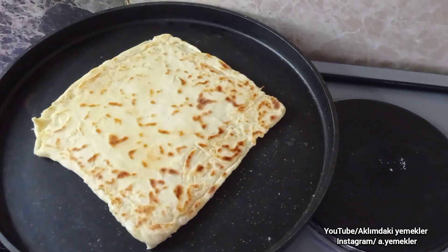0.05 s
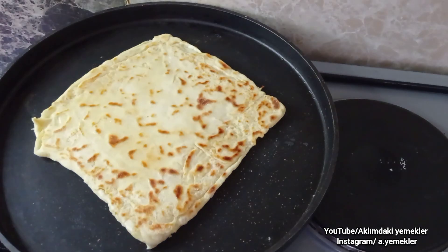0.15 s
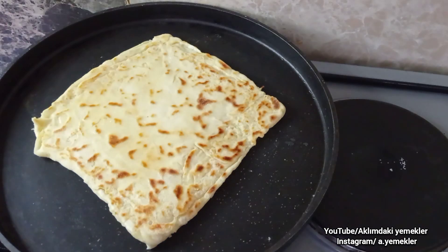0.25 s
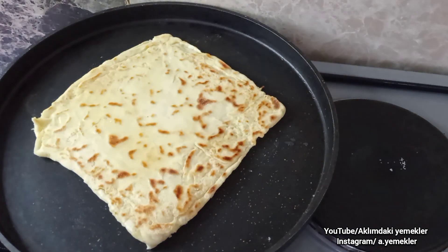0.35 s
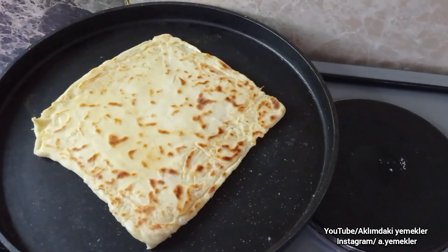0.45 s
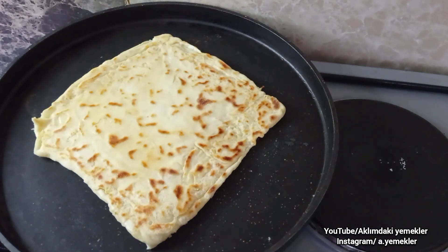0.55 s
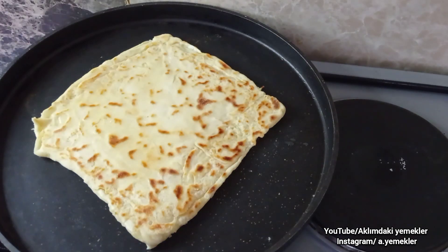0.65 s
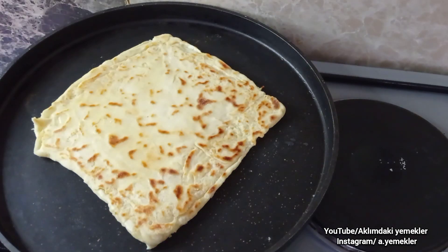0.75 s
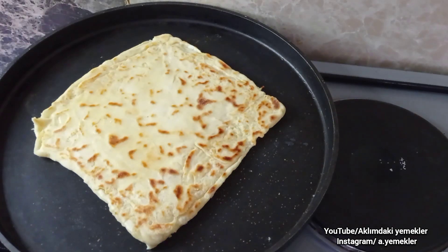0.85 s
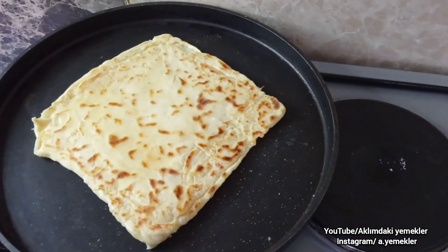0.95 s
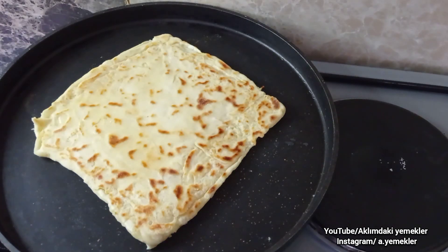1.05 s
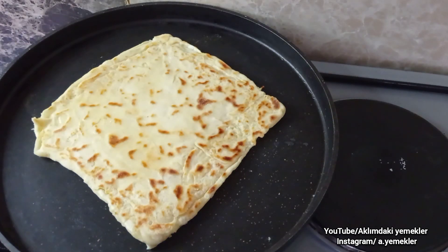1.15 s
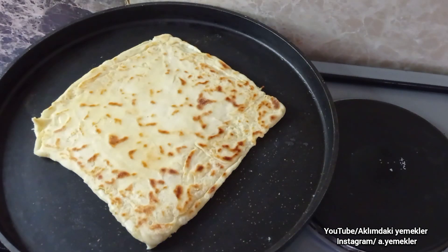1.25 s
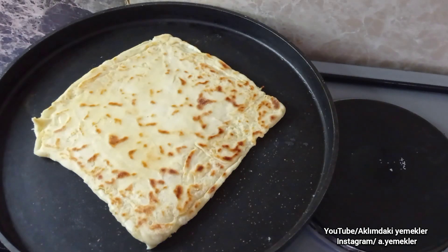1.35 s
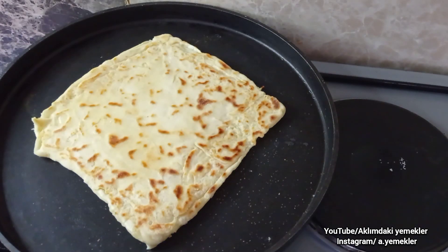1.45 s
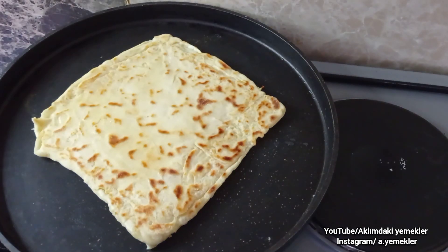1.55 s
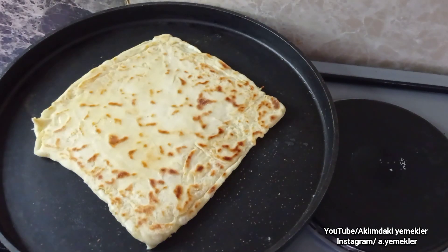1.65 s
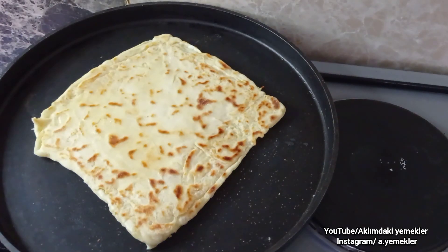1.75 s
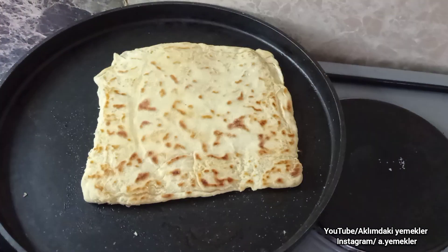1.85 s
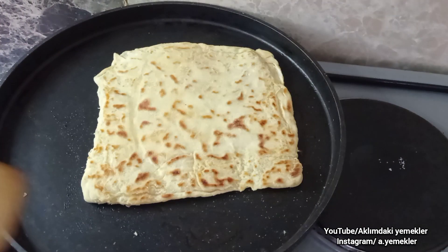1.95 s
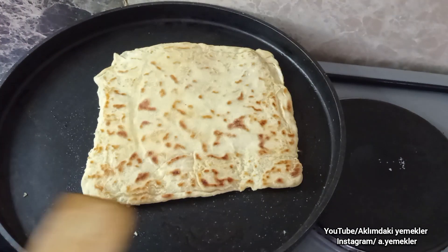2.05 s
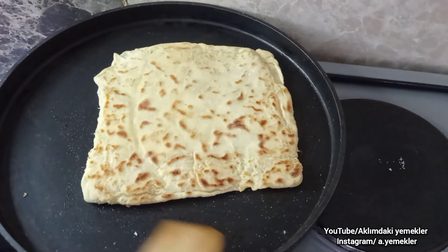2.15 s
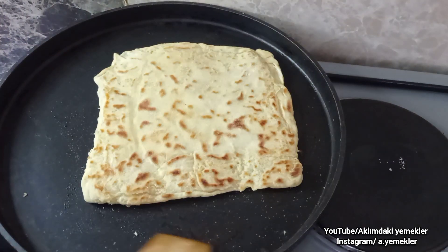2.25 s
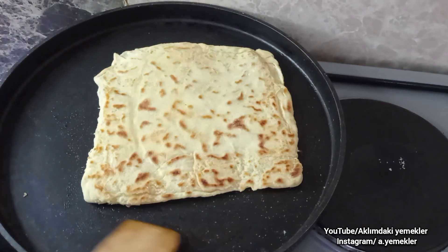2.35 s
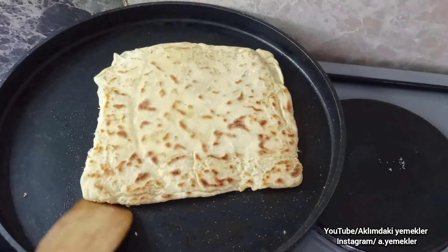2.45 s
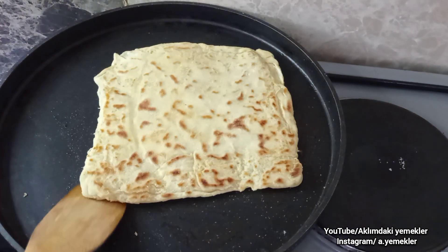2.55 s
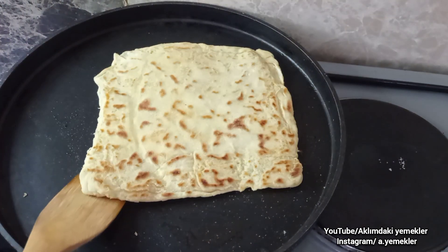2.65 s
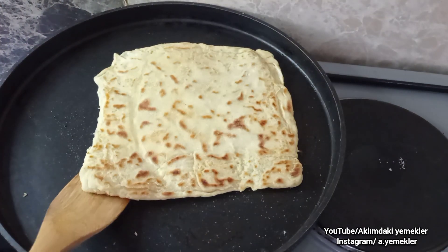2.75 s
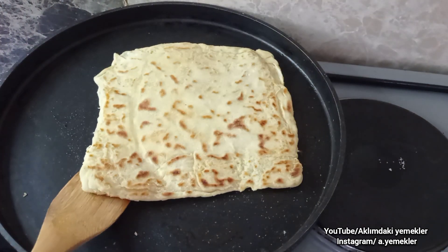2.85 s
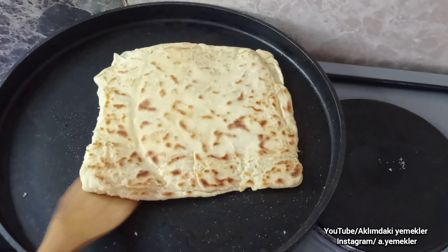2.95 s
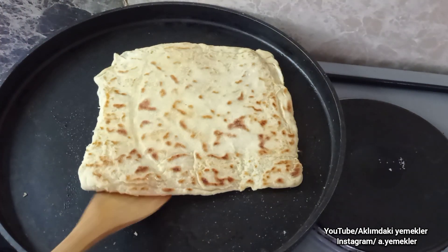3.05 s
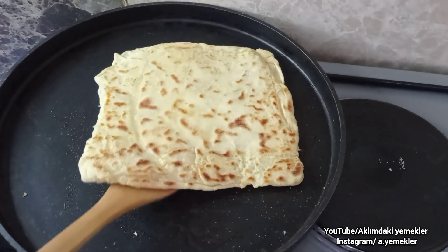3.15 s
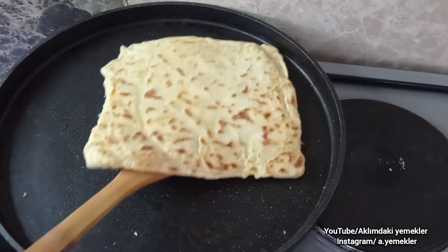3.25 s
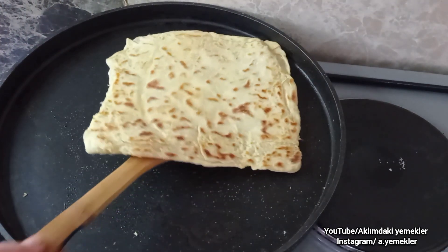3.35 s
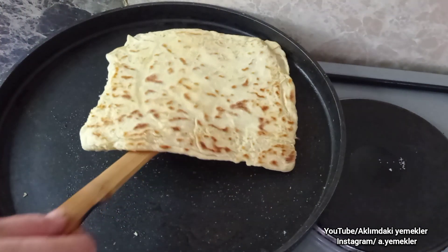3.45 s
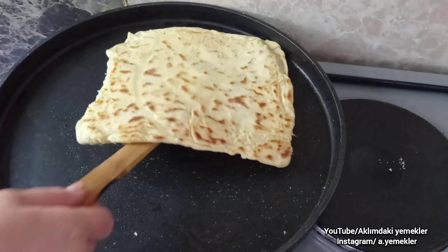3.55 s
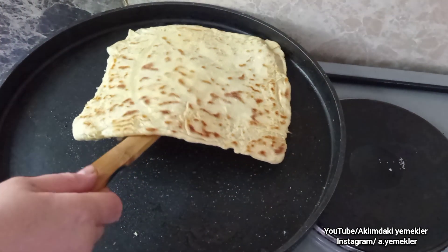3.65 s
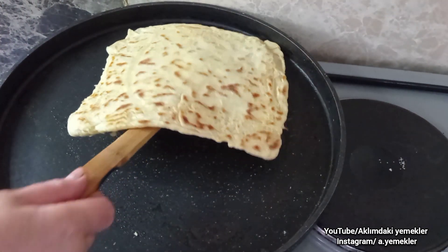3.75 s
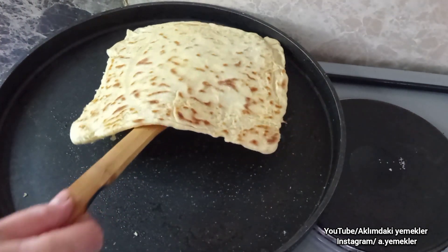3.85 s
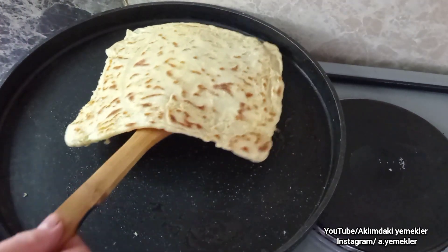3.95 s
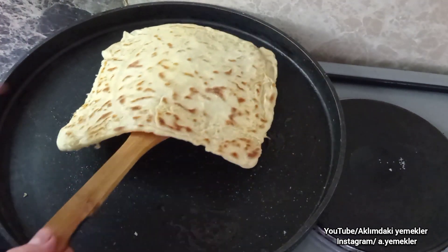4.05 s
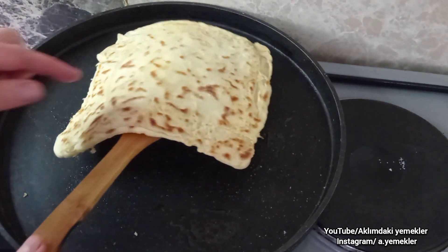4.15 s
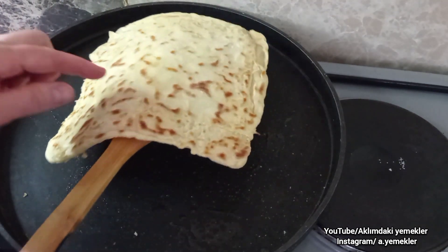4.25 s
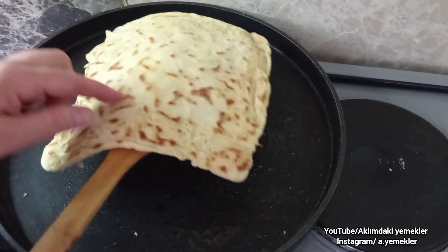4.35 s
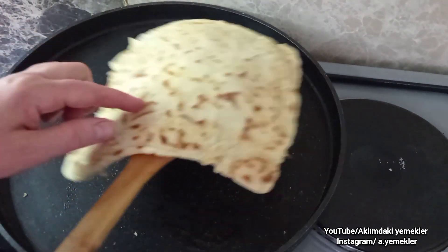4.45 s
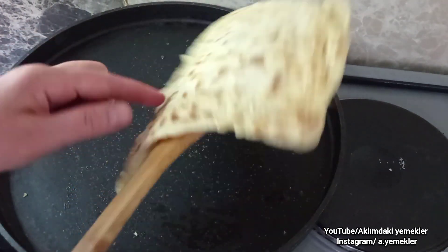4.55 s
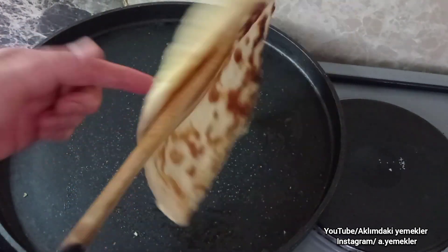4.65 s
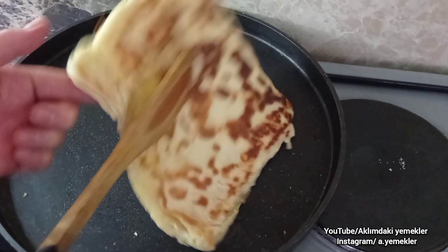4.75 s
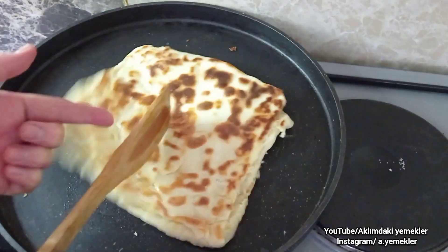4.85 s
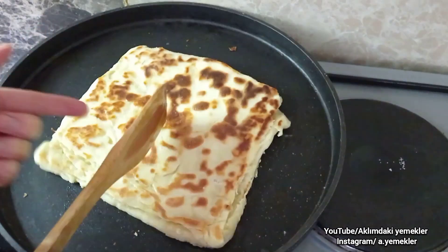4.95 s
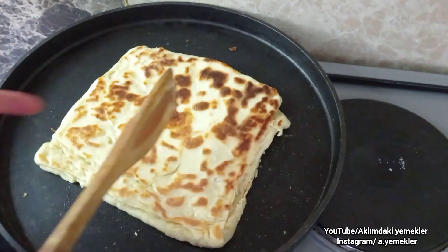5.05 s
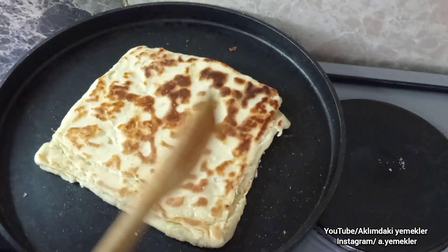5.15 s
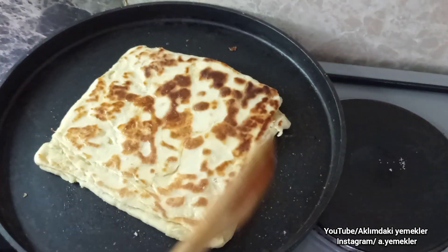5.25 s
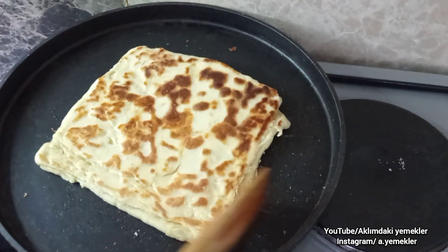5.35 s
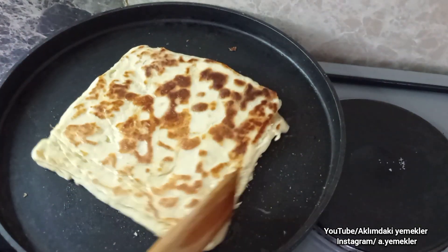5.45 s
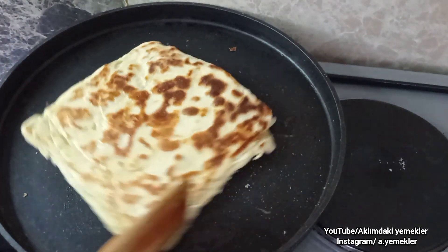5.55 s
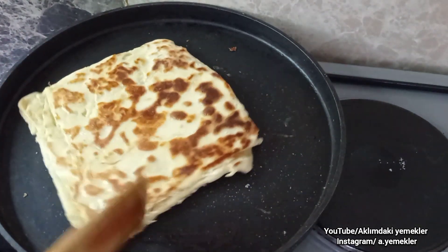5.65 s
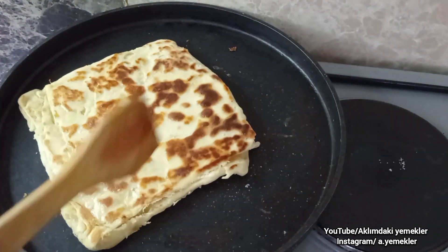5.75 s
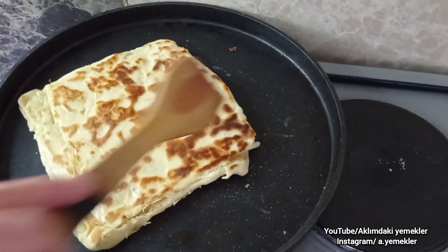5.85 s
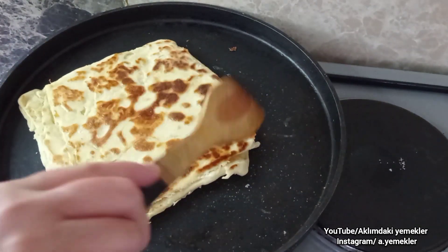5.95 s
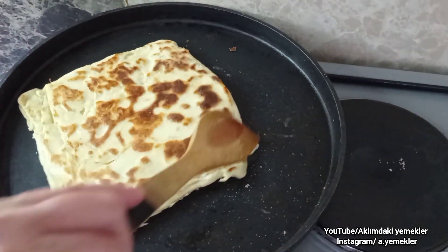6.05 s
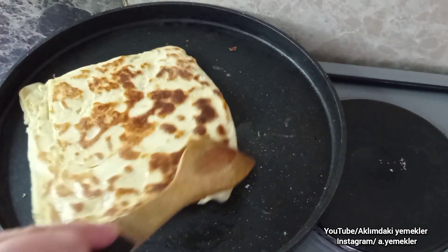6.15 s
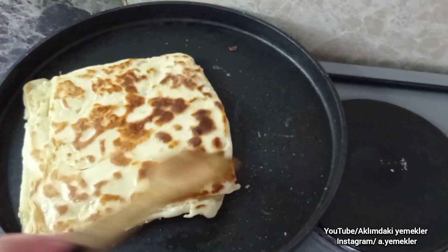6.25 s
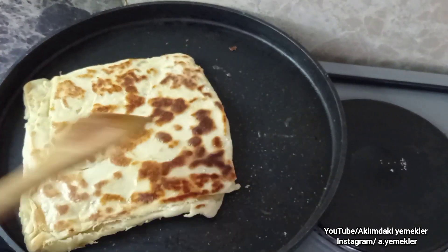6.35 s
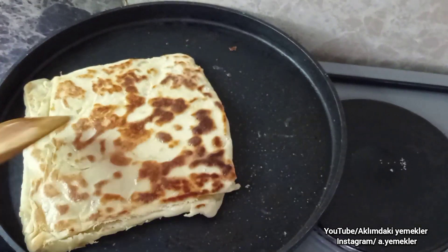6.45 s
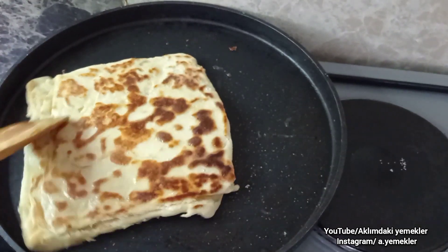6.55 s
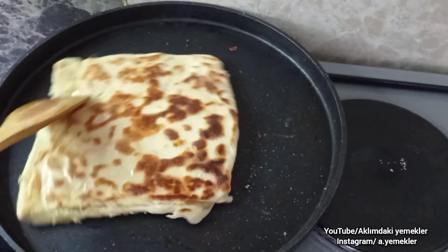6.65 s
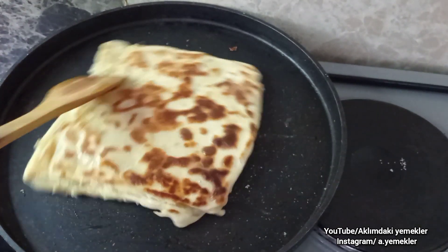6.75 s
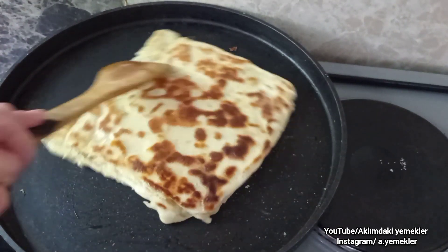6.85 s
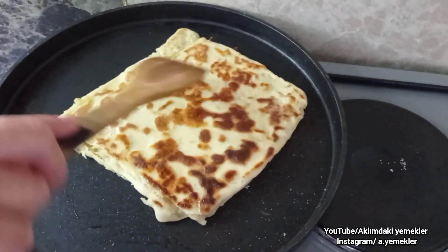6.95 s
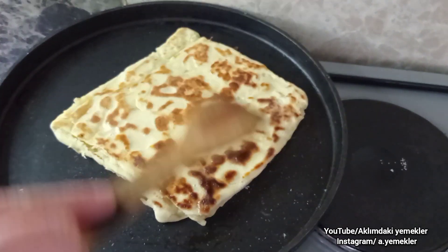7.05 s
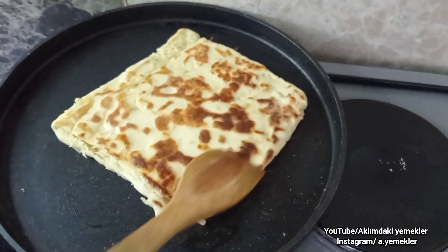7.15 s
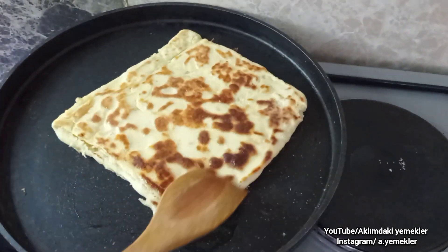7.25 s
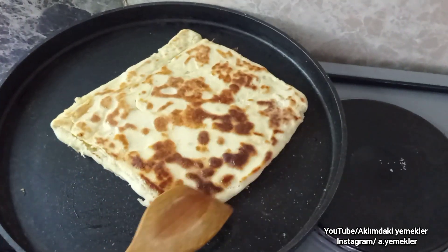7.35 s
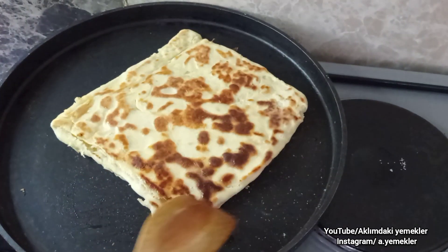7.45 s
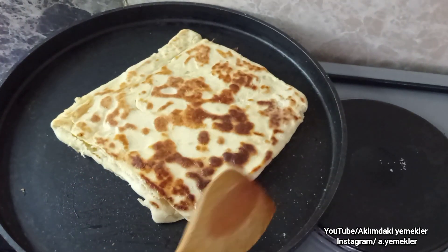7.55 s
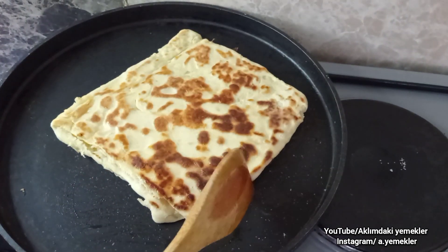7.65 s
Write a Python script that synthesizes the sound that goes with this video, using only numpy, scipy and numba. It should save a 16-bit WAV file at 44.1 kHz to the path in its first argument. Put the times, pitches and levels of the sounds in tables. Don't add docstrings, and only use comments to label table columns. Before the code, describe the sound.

Quiet burner noise opens, stops dead for a moment and swells back. Light wooden taps lead to a long dry scrape under bread, with airy steam and crackling fat spits. The flip lands with a loud wood-on-metal crack and dull boom, then brief rasping pushes alternate with knocks. Close small microphone, slight kitchen reflections.

```python
import sys
import numpy as np
from scipy import signal
from scipy.fft import rfft, irfft, next_fast_len
from scipy.io import wavfile
from scipy.ndimage import uniform_filter1d
from numba import njit

SR = 44100
rng = np.random.default_rng(int(sys.argv[2]) if len(sys.argv) > 2 else 0)


def level_to_linear(level):
    exponent = np.asarray(level, float) / 20
    return 10 ** exponent


def inscribe(sig):
    pcm = np.round(np.clip(np.atleast_2d(sig).T, -1, 1) * 32767)
    wavfile.write(sys.argv[1], SR, pcm.astype(np.int16))


N = 340011
TIME = np.arange(N) / SR

# t/s, peak level/dB, contact colour f/Hz, pan ring level/dB, bright crack level/dB
KNOCKS = [(2.2877, -43, 1160, -3, 2), (2.2948, -36.5, 371, -17, -30), (3.003, -40.5, 970, -26, -22),
          (4.81, -44, 1120, 6, -14), (4.828, -28.5, 238, -4.5, -26), (4.834, -29, 640, -19, -20),
          (4.899, -22.5, 900, -20, 5.5), (4.9006, -16, 2245, 1.5, -4.5), (5.359, -24, 1510, 6, -47),
          (5.364, -32, 497, -11, -39), (6.0045, -35.5, 2570, -16, 6), (6.0151, -26.5, 427, 2.5, -27),
          (6.5345, -45.5, 1490, 6, -28), (6.585, -30, 1780, 1.5, -22), (7.1301, -30, 1830, -11, -10),
          (7.1328, -24.5, 967, -0.5, -9.5), (7.23, -38.5, 403, -12, -12), (7.298, -41, 1060, -3, 6),
          (7.305, -42.5, 1080, -21, 8.5), (7.681, -42, 980, -0.5, 0), (7.683, -47.5, 1510, -8, -1)]
PAN_HZ = [167, 366, 431, 635, 705, 872, 1090, 1351, 1410, 1480, 1530, 1810, 2024, 2153, 2225, 2304, 2600,
          2710, 3128, 3445, 4068, 4972, 5865, 6797, 7795]
# level/dB struck on bare floor, level/dB struck through bread, t60/s
PAN_MODES = [(-42, -46, 0.3), (-14, -9.5, 0.17), (-16, 0, 0.24), (-9, 2, 0.09), (-29.5, -22, 0.58),
             (-15.5, -11, 0.13), (-12, -2.5, 0.098), (-5.5, -26, 0.097), (-26, -2, 0.12), (-1.5, -11, 0.11),
             (-26, 6, 0.024), (-28, -2, 0.059), (-11, -11, 0.18), (-7, -3, 0.14), (-14.5, -17.5, 0.26),
             (-11.5, -30, 0.094), (-7, -3, 0.054), (-12, 5, 0.032), (-20, -6.5, 0.088), (-9.5, -5, 0.099),
             (-21, -2.5, 0.091), (-16, -6.5, 0.089), (-17, -2, 0.045), (-17, -10.5, 0.087), (-40, -21, .08)]
# start t/s, hold t/s, grating level/dB, grating centre f/Hz, steam level/dB
PUSHES = [(2.308, 0.44, -60, 1840, -56.5), (2.405, .01, -58.5, 2340, -49.5), (2.442, 0.029, -57, 2377, -45),
          (3.03, .06, -46.5, 700, -51), (2.8, 0.025, -69.5, 700, -71), (2.775, .2, -75.5, 1500, -60.5),
          (3.57, 0.12, -54, 1820, -42), (4.728, .02, -65, 2040, -47.5), (4.772, 0.0073, -40.5, 2000, -42.5),
          (4.824, 0.036, -39.5, 900, -43.5), (4.898, 0.039, -36, 2110, -46), (5.036, 0.17, -70, 1500, -70),
          (5.429, 0.18, -49, 1620, -55), (5.526, 0.13, -37.5, 1540, -44),
          (6.037, 0.083, -43.5, 1510, -54.5), (6.138, 0.088, -41, 1600, -49.5),
          (6.547, 0.0051, -50.5, 1570, -46), (6.603, 0.091, -40, 1600, -48), (6.717, 0.18, -39, 1600, -45),
          (7.159, 0.053, -46, 1180, -45.5), (7.262, 0.027, -65, 1290, -47), (7.3, 0.073, -50.5, 1250, -51)]
# t/s, grating level/dB (blade pressure), escaping steam level/dB
SLIDE = [
    (3.0, -43.5, -44),
    (3.158, -46, -53.5),
    (3.32, -43.5, -49.5),
    (3.4, -45.5, -49.5),
    (3.55, -46, -49.5),
    (3.75, -58, -47),
    (3.86, -52.5, -54),
    (4.1, -63, -61),
    (4.62, -73, -73.5),
]
# f/Hz, level/dB per Hz
GRATE_SPECTRUM = [(120, -50), (200, -45), (350, -2.5), (600, 2.5), (1000, 2.5), (1500, 1), (2200, -1.5),
                  (3200, -6.5), (4500, -9.5), (6500, -18), (11000, -49)]
# grating centre f/Hz, level/dB
EDGE_SING = [(1000, -9.5), (1650, -36), (2000, -15), (2190, 10)]
# f/Hz, level/dB per Hz
STEAM_SPECTRUM = [(1200, -19), (2000, -14.5), (3000, -7.5), (4000, -7), (5000, -4.5), (6300, -0.5),
                  (7300, -4), (8300, -13), (10000, -14), (12000, -24), (13400, -24.5), (14300, -15),
                  (15000, -28), (15600, -4)]
# t/s, peak level/dB, top level/dB
SPITS = [(2.085, -49.5, -26), (2.2714, -59, -44), (2.4299, -37, -19), (3.2425, -41, -19),
         (3.313, -30.5, -25), (3.3306, -28.5, -26), (3.3482, -27, -29), (3.5985, -34, -17),
         (3.682, -28, -5), (3.7947, -36.5, -5), (3.8214, -38, -4), (3.937, -37, -25), (4.0385, -42, -18),
         (4.071, -39.5, -19), (4.1525, -42, -18), (4.51, -42, -12), (4.575, -49, -20), (4.6089, -52, -18),
         (4.662, -41.5, -13), (4.6917, -47.5, -2), (4.7066, -30, -14.5), (4.8468, -25.5, -15),
         (4.854, -44, -25.5), (4.9005, -33.5, 0), (5.0734, -50, -24), (5.2906, -50, -24),
         (5.5253, -39.5, -1), (6.384, -44, -25), (7.214, -31.5, -25), (7.231, -35, -27)]
# t/s, boom level/dB, hold t/s
SHOVES = [(1.59, -74, 0.017), (2.388, -76, 0.027), (2.62, -71, 0.3), (3.835, -70, 0.18),
          (4.836, -51, 0.045), (4.889, -43, 0.062), (4.988, -54, 0.027), (5.366, -54, 0.043),
          (6.007, -68, 0.067), (6.577, -53, 0.011), (7.143, -61.5, 0.06), (7.318, -63.5, 0.035)]
# f/Hz, level/dB per Hz
GAS_SPECTRUM = [(20, -20), (110, -1), (270, -14), (500, -8.5), (830, -18), (1300, -15.5), (1750, -15.5),
                (2900, -18), (4200, -9), (6200, -2.5), (8200, -13), (13200, -26.5), (14700, -18.5),
                (16000, -12)]
# f/Hz, width f/Hz, rms level/dB
FLAME_MODES = [(122, 25, -83), (626, 34, -73), (996, 60, -88), (1385, 80, -75.5)]


def level(x, db):
    return x * level_to_linear(db) / np.sqrt(np.mean(x ** 2))


@njit
def svf(x, hz, width):
    y, b, l = np.empty(len(x)), 0., 0.
    for i in range(len(x)):
        g, k = np.tan(np.pi * hz[i] / SR), width[i] / hz[i]
        v = (b + g * (x[i] - l)) / (1 + g * (g + k))
        b, l, y[i] = 2 * v - b, l + 2 * g * v, k * v
    return y


def band(x, hz, width):
    return svf(x, hz + np.zeros(len(x)), width + np.zeros(len(x)))


def high_pass(x, hz):
    return signal.sosfilt(signal.butter(2, hz, "high", fs=SR, output="sos"), x)


def colour(x, points):
    hz, db = np.transpose(points)
    size = next_fast_len(N)
    f = np.arange(size // 2 + 1) * SR / size + 1
    gain = level_to_linear(np.interp(np.log(f), np.log(hz), db))
    return irfft(rfft(x, size) * gain, size)[:N]


def walk(rate_hz):
    k = int(SR / rate_hz)
    steps = np.repeat(rng.standard_normal(N // k + 1), k)
    return uniform_filter1d(uniform_filter1d(steps, k), k)[:N] * np.sqrt(2)


def grains(scatter_db, smear_s):
    sizes = level_to_linear(scatter_db * rng.exponential(size=N))
    puffs = signal.lfilter([1], [1, -np.exp(-1 / (smear_s * SR))], sizes ** 2)
    return np.sqrt(puffs) * rng.standard_normal(N)


def summed(dbs):
    return 10 * np.log10(np.sum(level_to_linear(dbs) ** 2, axis=0) + 1e-30)


def contact(start_s, hold_s, fall_db_per_s, landing_s=0.07):
    rise_db_per_s = 369
    landed_s = min([k[0] for k in KNOCKS if start_s - landing_s < k[0] < start_s], default=0)
    rise = rise_db_per_s * (start_s - TIME)
    fall = fall_db_per_s * (TIME - start_s - hold_s)
    db = -np.maximum(np.maximum(rise, fall), 0)
    return np.where(TIME < landed_s, -200, db)


def blade_motion():
    fall_db_per_s, boom_fall_db_per_s, boom_under_grating_db = 256, 149, -30
    slide_hz = 1063
    start_s, hold_s, push_grate, push_hz, push_steam = np.transpose(PUSHES)
    s, slide_grate, slide_steam = np.transpose(SLIDE)
    shapes = [contact(a, h, fall_db_per_s) for a, h in zip(start_s, hold_s)]
    shapes.append(contact(s[0], s[-1] - s[0], fall_db_per_s, landing_s=0))
    shape = np.array(shapes)
    grates = shape + np.vstack([push_grate[:, None] + 0 * TIME, np.interp(TIME, s, slide_grate)])
    steams = shape + np.vstack([push_steam[:, None] + 0 * TIME, np.interp(TIME, s, slide_steam)])
    grate_db = summed(grates)
    share = level_to_linear(grates) ** 2 + 1e-30
    centre_hz = np.append(push_hz, slide_hz) @ share / share.sum(axis=0)

    covered_top_db, lifted_top_db, lift_s, drop_s = -5, 8.5, 3.07, 4.68
    lifted = uniform_filter1d(1. * (TIME > lift_s) * (TIME < drop_s), size=SR // 10)
    top_db = covered_top_db + lifted * (lifted_top_db - covered_top_db)

    booms = [db + contact(a, h, boom_fall_db_per_s) for a, db, h in SHOVES]
    booms.append(grate_db + boom_under_grating_db)
    return grate_db, centre_hz, summed(steams), top_db, summed(np.array(booms))


def pan_ring(x, weights, damping=1., bare=False):
    out = 0
    for hz, (bare_db, bread_db, t60_s), weight in zip(PAN_HZ, PAN_MODES, weights):
        r = np.exp(-np.log(1000) / (max(t60_s * damping, .01) * SR))
        turn = 2 * np.pi * hz / SR
        mode = signal.lfilter([0, r * np.sin(turn)], [1, -2 * r * np.cos(turn), r * r], x)
        out = out + weight * level_to_linear(bare_db if bare else bread_db) * mode
    return out


def knocks():
    clatter_t60_s, pressed_t60_s = 0.061, 0.029
    out, t = np.zeros(N + SR), TIME[:SR // 2]
    chance = rng.standard_normal((len(KNOCKS), len(t) + 2 * len(PAN_HZ)))
    for (s, db, hz, ring_db, crack_db), c in zip(KNOCKS, chance):
        pressed = 5.9 < s < 7.25
        bare = 5.3 < s < 5.8
        t60_s = pressed_t60_s if pressed else clatter_t60_s
        size, side, noise = np.split(c, [len(PAN_HZ), 2 * len(PAN_HZ)])

        push = -np.sin(np.pi * np.clip(t * max(hz, 500) * 2, 0, 1))
        fade = level_to_linear(-60 * t / max(t60_s, .01))
        clatter = noise * (1 - np.exp(-t / 0.00014)) * fade
        dull = band(band(clatter, 930, 1840), 1535, 1950)
        wood = 3.2 * band(push + 0.8 * dull, hz, .11 * hz) + 0.5 * band(push, hz, 3.9 * hz) + 0.87 * dull

        crack = band(band(band(clatter * fade ** .4, 6200, 3000), 5900, 4000), 4800, 5000)
        crack = level_to_linear(crack_db) * crack / np.abs(crack).max()

        tap = np.sin(np.pi * np.clip(t * 5000, 0, 1)) ** 2
        reach = 1 if bare else np.minimum(1.2 * np.array(PAN_HZ) / hz, 1)
        weights = reach * np.sign(side) * level_to_linear(1.36 * size)
        tone = pan_ring(tap + 0.048 * dull + 0.65 * crack, weights, t60_s / 0.055, bare=bare)
        tone = tone / np.abs(tone).max() - 0.7 * band(tap, 3000, 2370)

        hit = wood / np.abs(wood).max() + crack + level_to_linear(ring_db) * tone
        k = int(s * SR)
        out[k:k + len(t)] += level_to_linear(db) * hit
    return high_pass(out[:N], 190)


def grating(db, hz):
    unevenness_db = 1.5 * walk(40) + .8 * walk(12)
    slips = level(colour(grains(2.4, .0015) * level_to_linear(unevenness_db), GRATE_SPECTRUM), 0)
    edge = svf(svf(slips, hz, 0.25 * hz), hz, 0.25 * hz)
    blade = level(edge, 0) * level_to_linear(np.interp(hz, *np.transpose(EDGE_SING)))
    steep = np.clip((hz - 1180) / 900, 0, 1)
    grit = np.diff(slips, prepend=0)
    hum = level(pan_ring(grit, rng.choice([-1, 1], len(PAN_HZ)), 0.63), -8.5)
    bare_hum = level(pan_ring(grit, np.ones(len(PAN_HZ)), 0.65, bare=True), -12) * steep
    lost_bass = steep * band(slips, 550, 1100)
    return (slips - lost_bass + blade + hum + bare_hum) * level_to_linear(db - 5.0)


def steam(db, top_db):
    surge_db = 1.43 * walk(45) + 0.8 * walk(10)
    fizz = level(colour(grains(2.8, .0007) * level_to_linear(surge_db), STEAM_SPECTRUM), 0)
    top = signal.sosfiltfilt(signal.butter(2, 8500, "high", fs=SR, output="sos"), fizz)
    shimmer = level(pan_ring(fizz, rng.choice([-1, 1], len(PAN_HZ)), 1.6), -9)
    return (fizz + shimmer + top * (level_to_linear(top_db) - 1)) * level_to_linear(db)


def spits():
    patter_s, gap_s, count = 4.2025, .0232, 12
    arch = np.linspace(-1, 1, count) ** 2
    patter = [(patter_s + k * gap_s, -42 - 4 * a, -26) for k, a in enumerate(arch)]  # t/s, level/dB, top/dB
    out, t = np.zeros(N + SR), TIME[:2048]
    chance = rng.standard_normal((len(SPITS) + count, len(t)))
    for (s, db, top_db), noise in zip(SPITS + patter, chance):
        if patter_s <= s < patter_s + count * gap_s:
            hz, narrow = 6520, 0.55
        else:
            hz, narrow = 6270 * (1 + 0.072 * noise[0]), 1
        puff = noise * (1 - np.exp(-t / 0.00033)) * (np.exp(-t / 0.0015) + 0.31 * np.exp(-t / 0.0093))
        tick = band(band(puff, hz, 2400 * narrow), hz, 4300 * narrow)
        top = band(band(puff, 9700, 3900), 9400, 4990)
        top = top + 1.9 * band(band(puff, 15000, 1170), 15000, 2000)
        spit = tick / np.abs(tick).max() + level_to_linear(top_db) * top / np.abs(top).max()
        k = int(s * SR)
        out[k:k + len(t)] += level_to_linear(db) * spit
    return out[:N]


def stove_boom(db):
    noise = rng.standard_normal(N)
    boom = 2.0 * band(noise, 130.7, 25.8) + 0.57 * band(noise, 168, 20)
    boom = boom + 0.69 * band(noise, 91, 41) + 0.16 * band(noise, 204, 92)
    return level(boom, 0) * level_to_linear(db + 2.0 * walk(20))


def burner():
    hiss = level(colour(rng.standard_normal(N), GAS_SPECTRUM), -64.5)
    out = hiss * level_to_linear(0.52 * walk(1.3) + 1.6 * walk(25))
    for hz, width_hz, db in FLAME_MODES:
        roar = band(band(rng.standard_normal(N), hz, width_hz), hz, 3 * width_hz)
        out = out + level(roar, db) * level_to_linear(2.6 * walk(8))
    return out


def kitchen(x):
    t = TIME[:SR // 2]
    t60_s, wash_db = 0.31, -39.0
    tail = band(rng.standard_normal(len(t)), 670, 5700) * level_to_linear(-60 * t / t60_s) * (t > .004)
    return x + signal.fftconvolve(x, tail * level_to_linear(wash_db))[:N]


def dropout():
    cut_s, back_s, fade_in_s = 1.663, 1.815, 0.37
    before_db, after_db, sag_db_per_s = 1.5, 5.5, -1.04
    since_s = np.maximum(TIME - back_s, 0)
    after = level_to_linear(after_db + sag_db_per_s * since_s) * (1 - np.exp(-since_s / fade_in_s))
    return np.where(TIME < cut_s, level_to_linear(before_db), after)


def scene():
    grate_db, grate_hz, steam_db, steam_top_db, boom_db = blade_motion()
    pan = knocks() + grating(grate_db, grate_hz) + steam(steam_db, steam_top_db) + spits() + stove_boom(boom_db)
    pan = high_pass(pan, 70)
    gain = dropout()
    return (kitchen(pan) * (gain > 0) + burner() * gain)[None]


def low_pass(x):
    return signal.sosfilt(signal.butter(12, 16810, fs=SR, output="sos"), x)


def record(dry):
    top_hz = 15500
    mix = signal.sosfilt(signal.ellip(8, .2, 45, top_hz, fs=SR, output="sos"), dry)
    return low_pass(mix)


dry = scene()
out = record(dry)
inscribe(out)
```